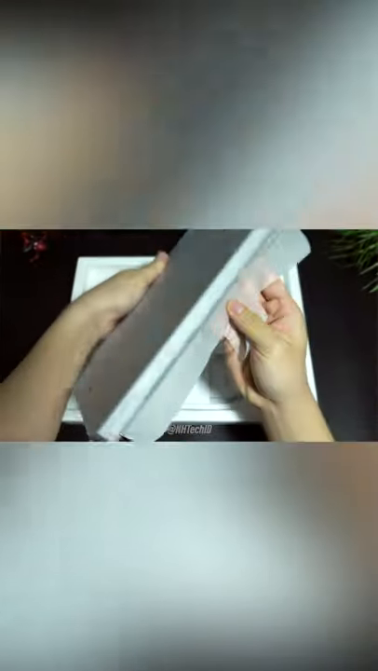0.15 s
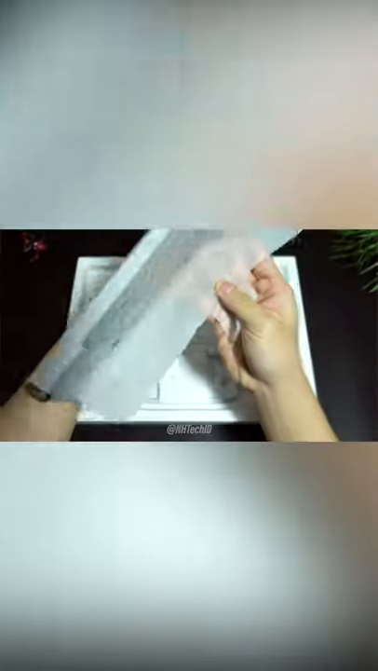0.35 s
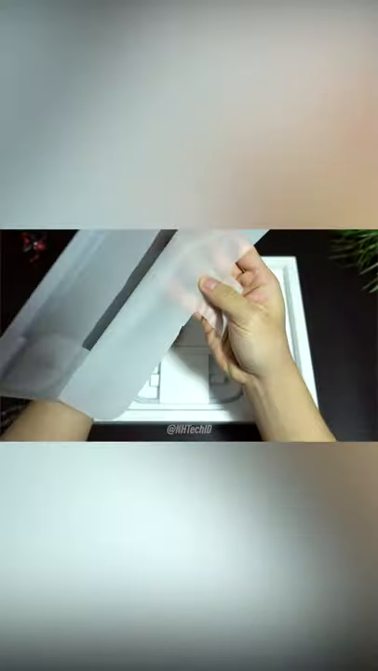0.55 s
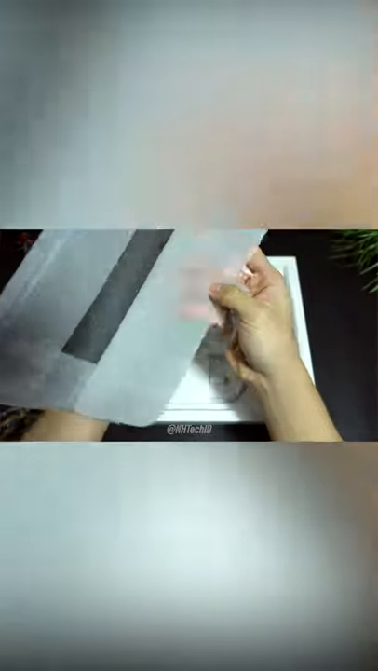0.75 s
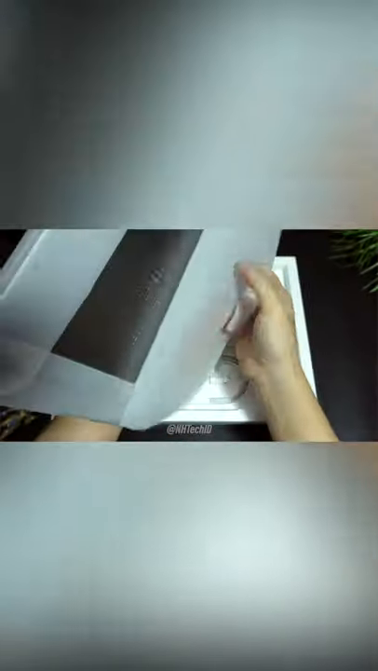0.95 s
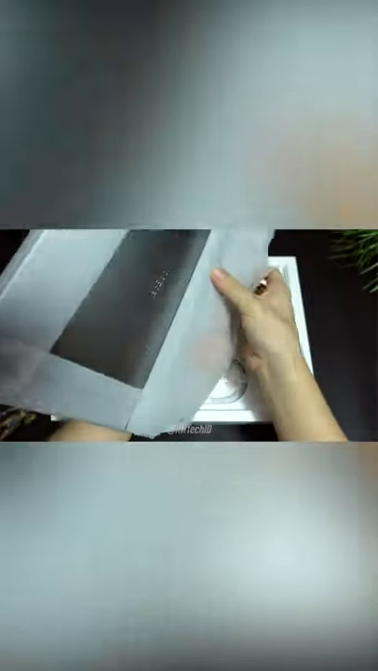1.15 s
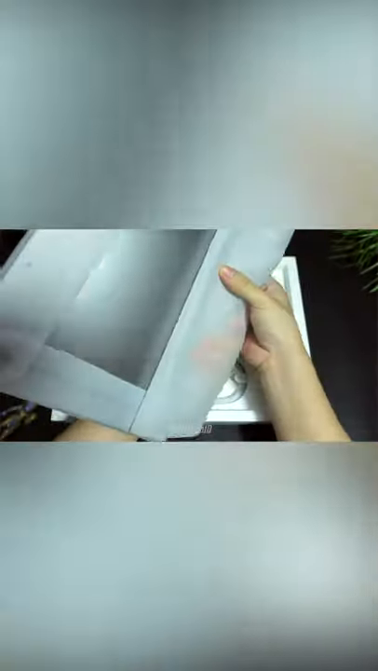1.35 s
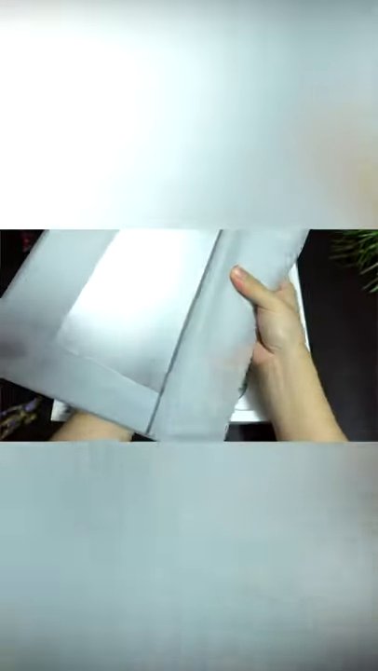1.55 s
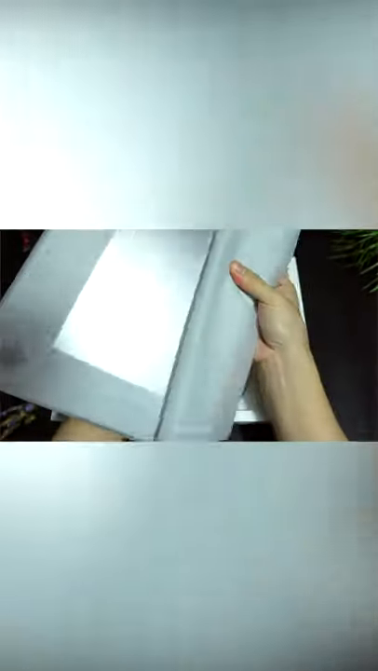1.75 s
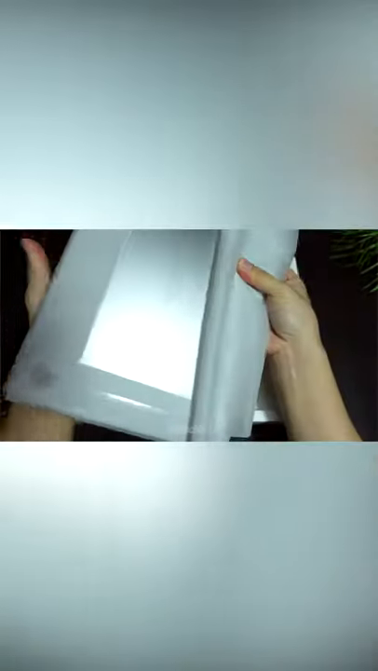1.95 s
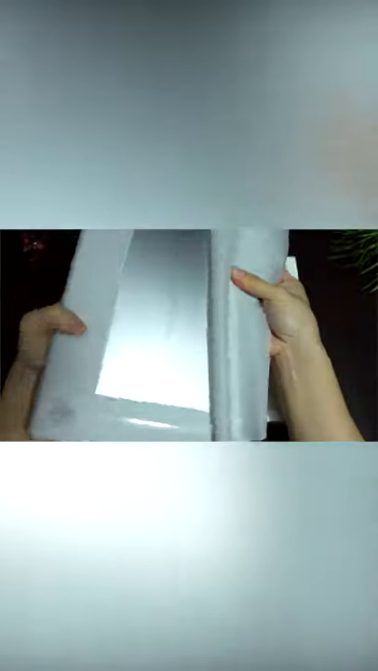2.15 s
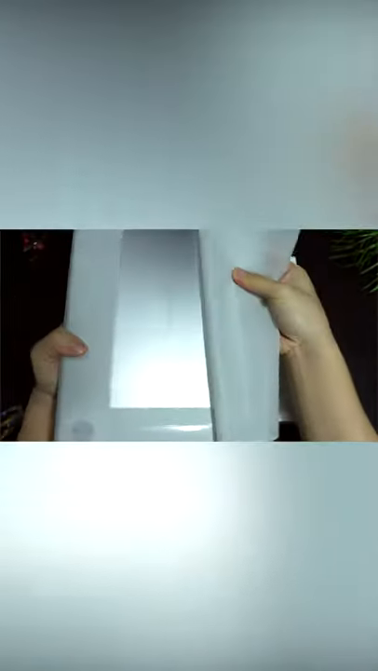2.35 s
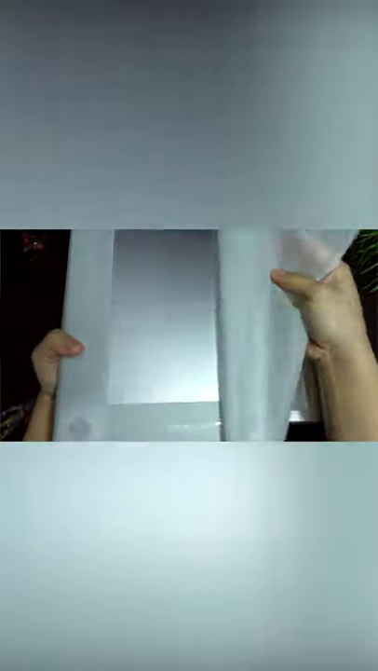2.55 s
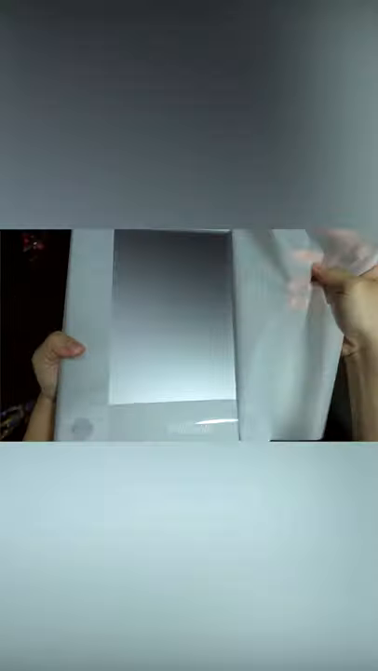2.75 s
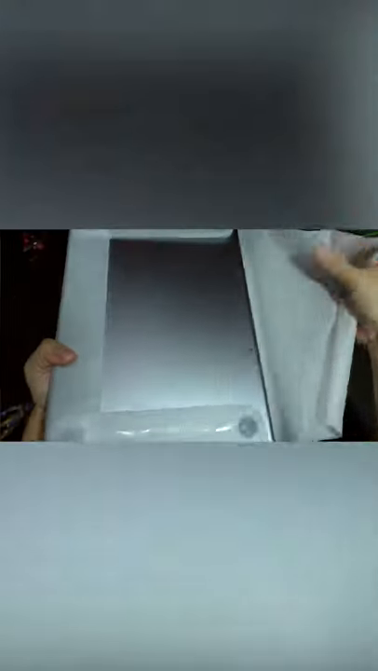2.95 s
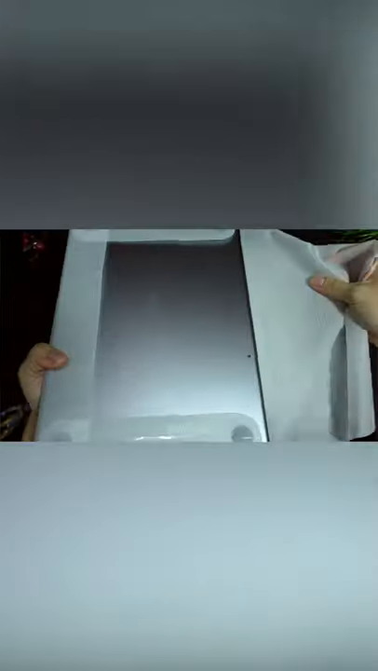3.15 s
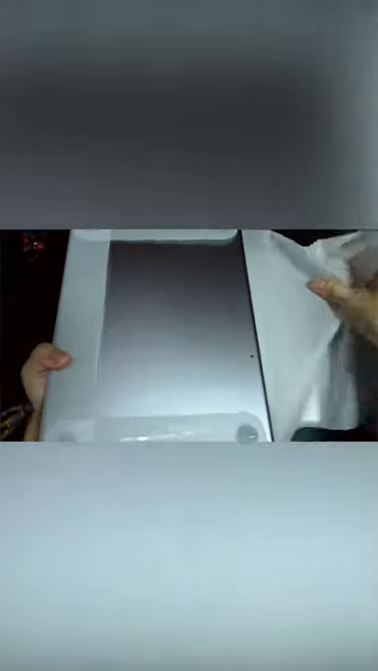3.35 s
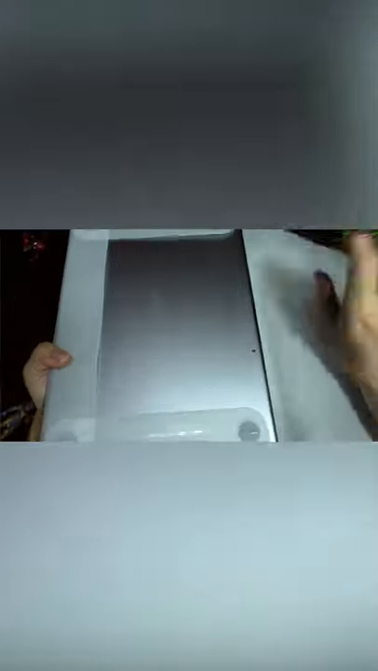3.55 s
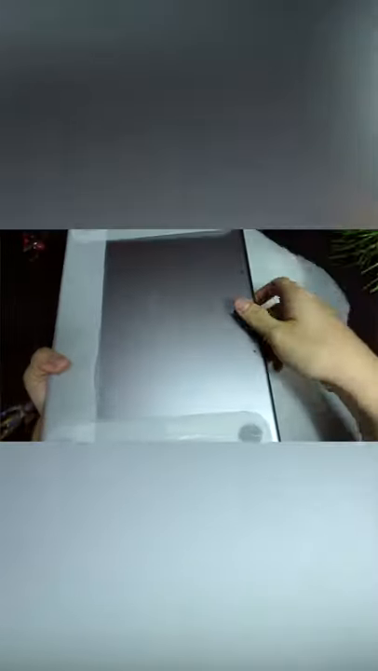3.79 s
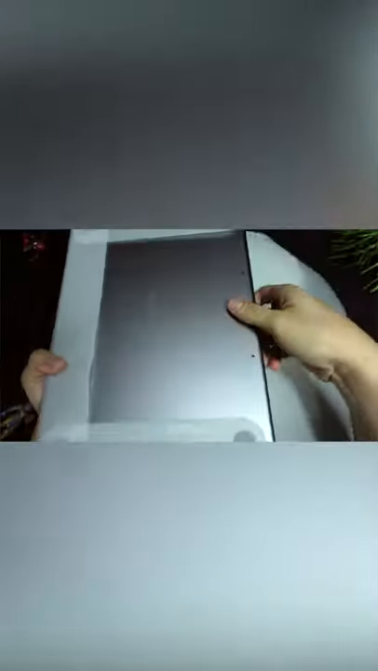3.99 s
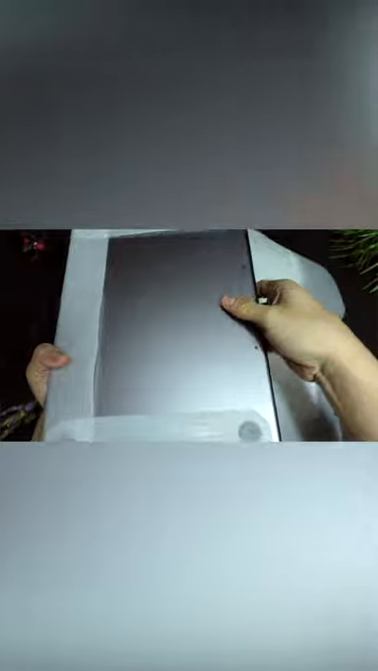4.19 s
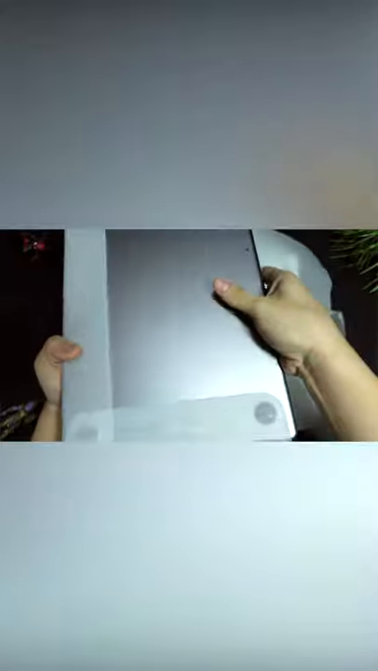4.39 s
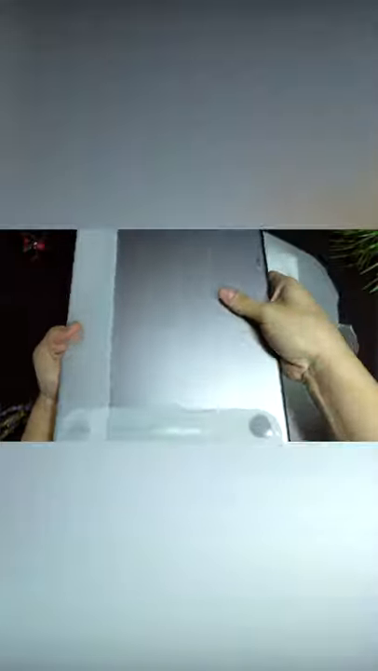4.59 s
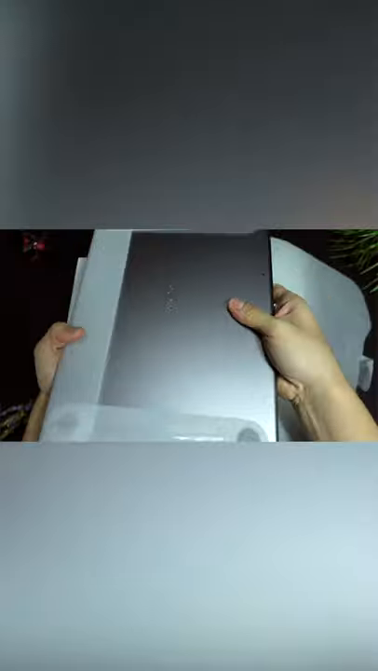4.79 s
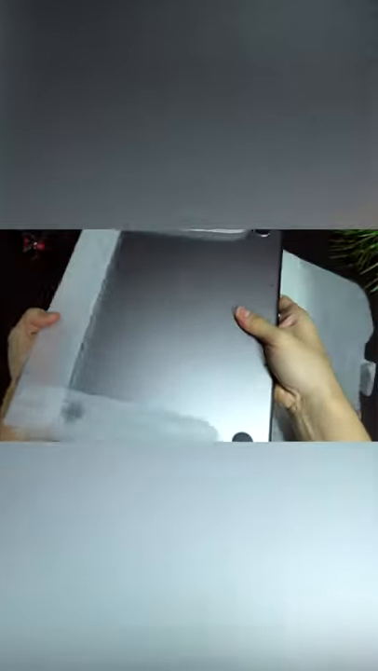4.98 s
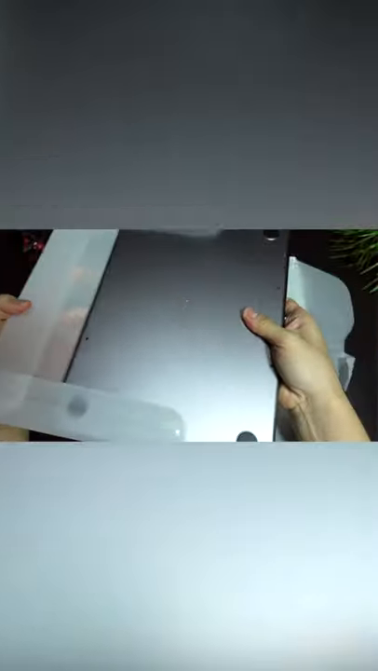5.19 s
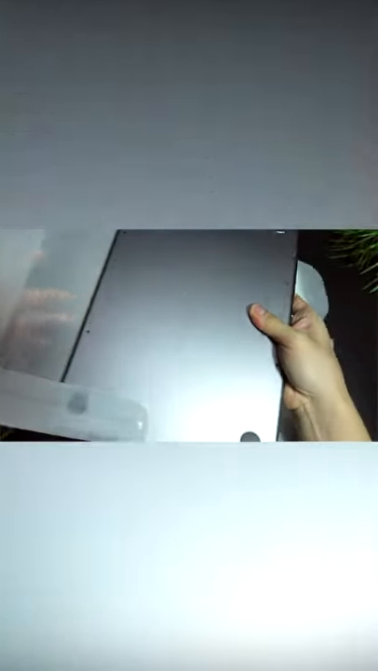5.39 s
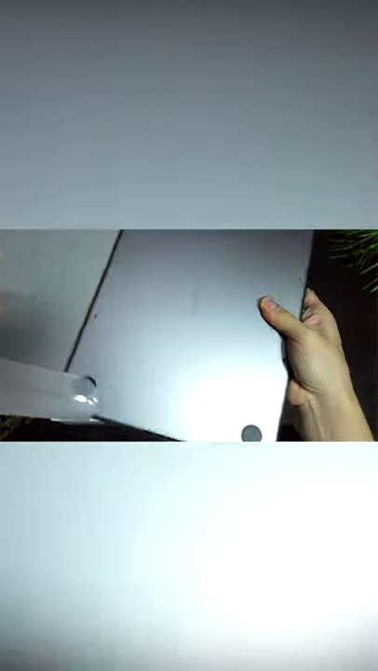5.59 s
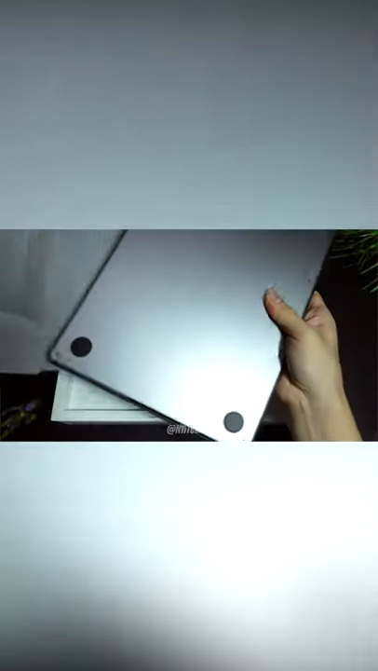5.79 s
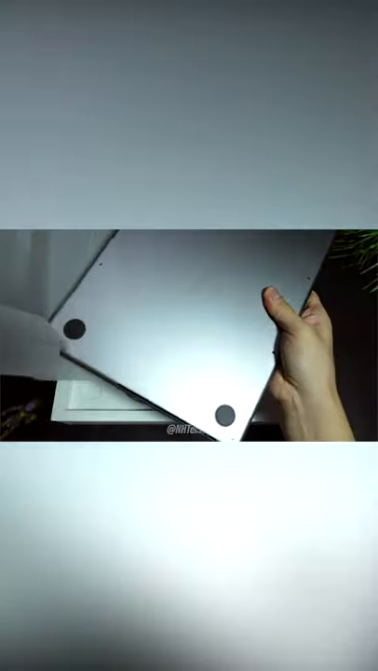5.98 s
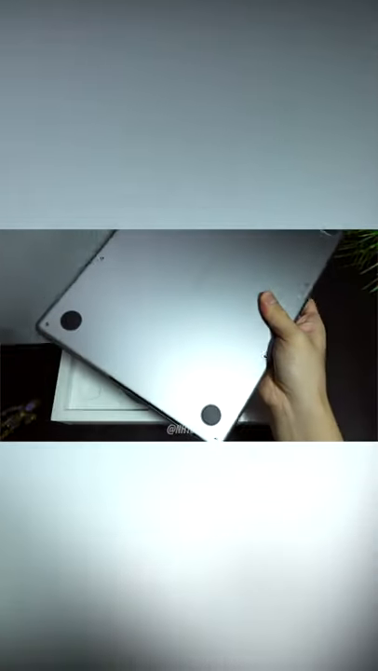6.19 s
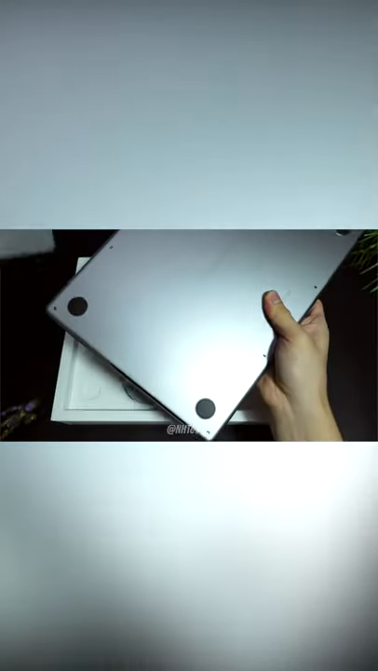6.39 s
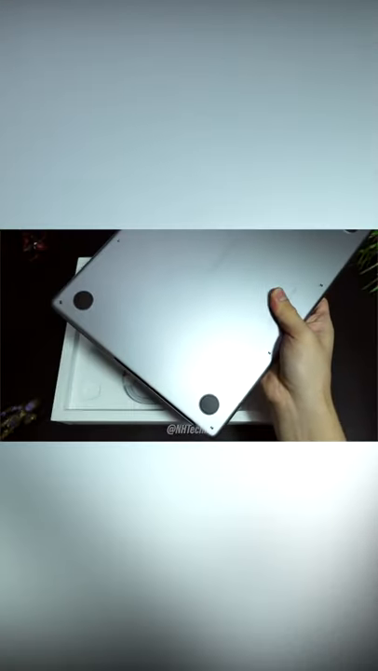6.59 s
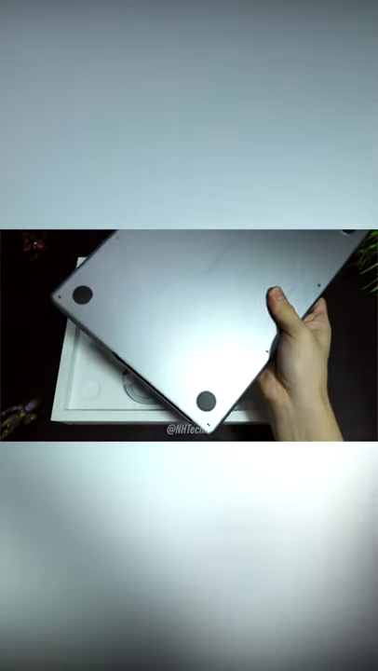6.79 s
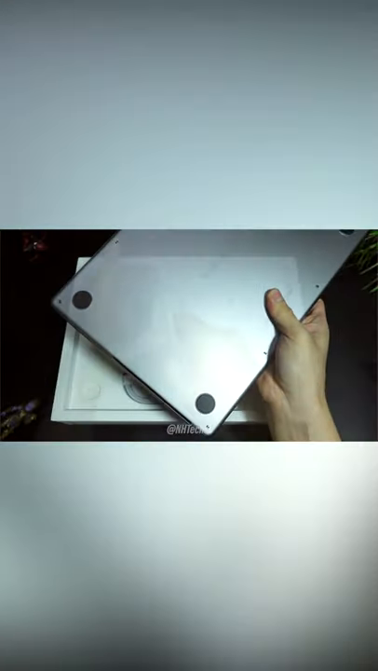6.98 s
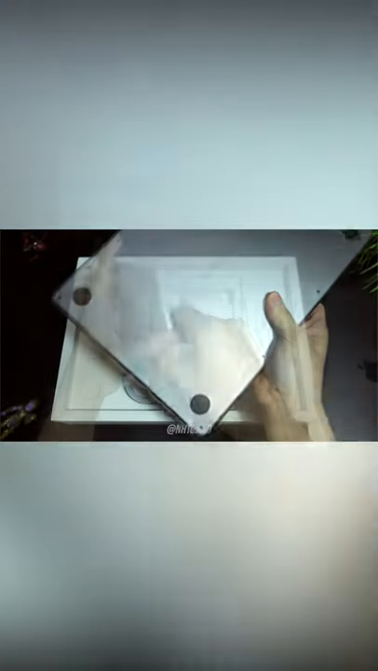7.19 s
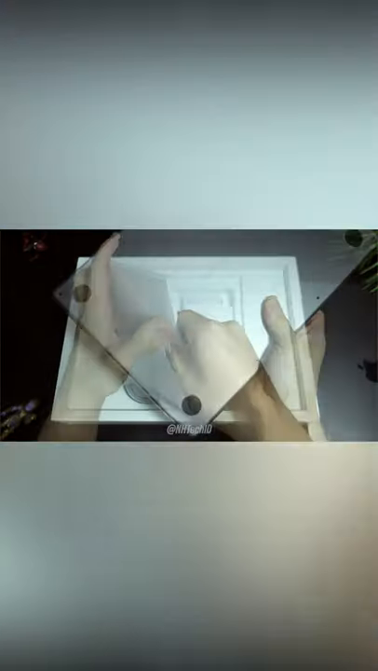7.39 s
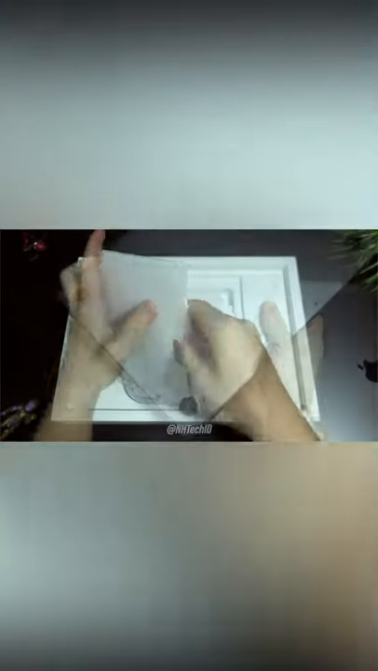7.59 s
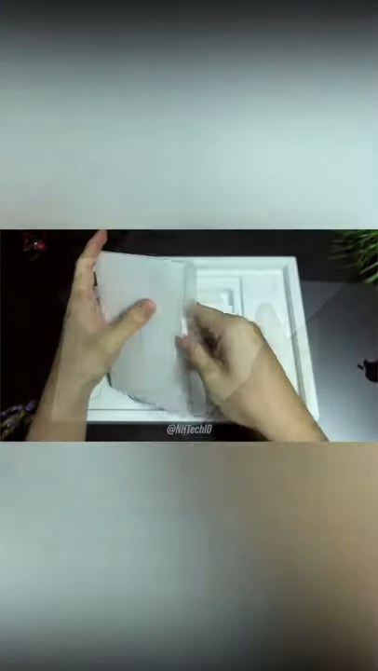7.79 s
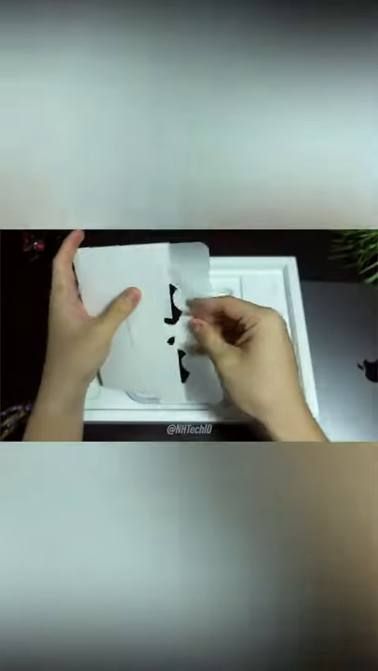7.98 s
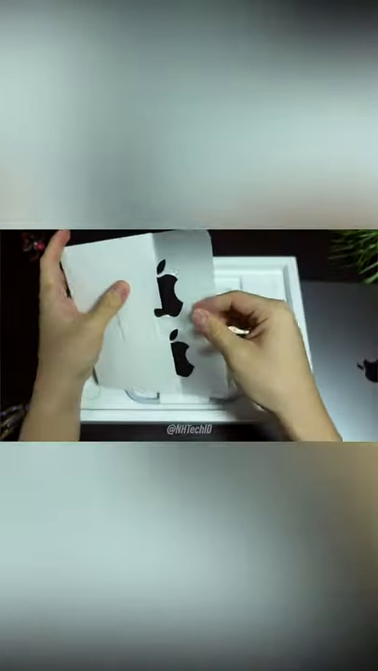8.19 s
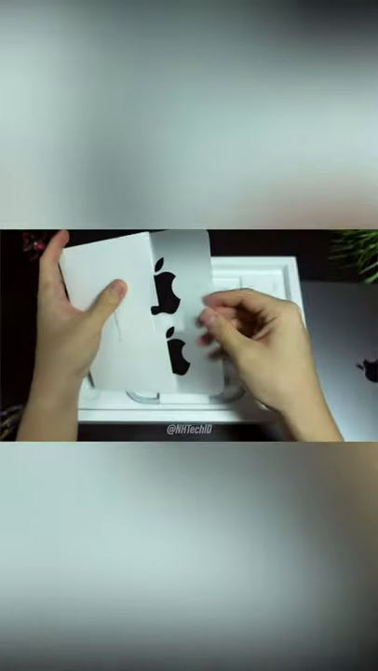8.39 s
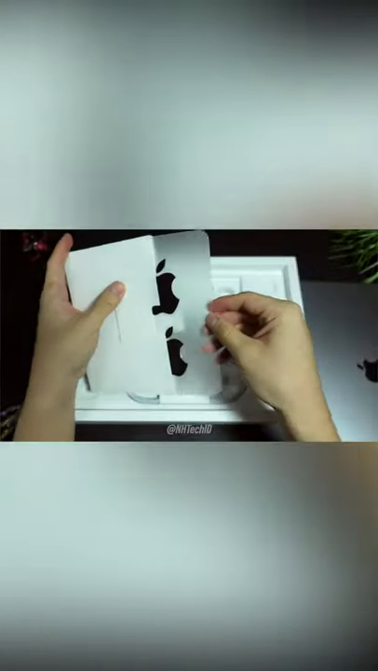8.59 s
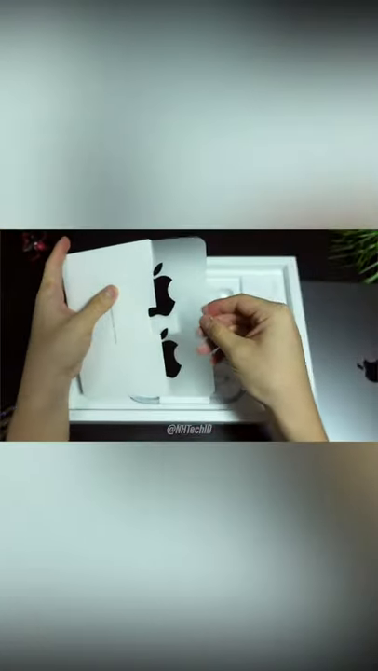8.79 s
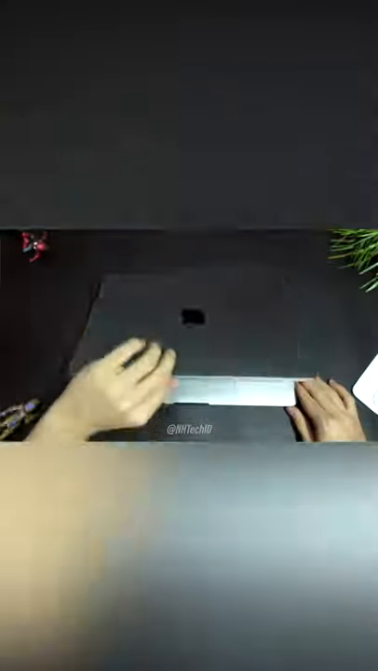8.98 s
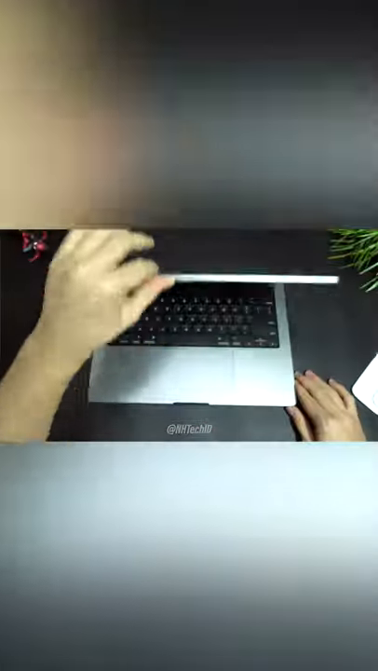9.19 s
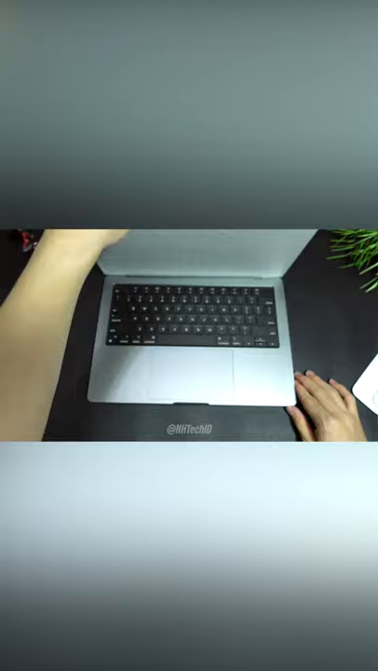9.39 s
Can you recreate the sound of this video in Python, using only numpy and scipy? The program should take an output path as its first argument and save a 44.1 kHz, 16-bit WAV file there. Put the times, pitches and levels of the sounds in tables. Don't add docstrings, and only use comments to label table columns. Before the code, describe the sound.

Stiff sheet packaging crackles and snaps sharply in bursts over papery sliding friction, with soft low knocks from hands and box. Activity is dense for the first five seconds, then eases into sparse, delicate card rustling. Near the end everything dips out briefly before the low hum and air of the room fade back with tiny nail ticks. Close microphone, short room reflections, slightly dulled extreme treble.

```python
import sys
import numpy as np
from scipy import signal
from scipy.fft import rfft, irfft, next_fast_len
from scipy.io import wavfile
from scipy.ndimage import uniform_filter1d

SR = 44100
rng = np.random.default_rng(int(sys.argv[2]) if len(sys.argv) > 2 else 0)


def materialize(psi):
    bounded = np.clip(np.atleast_2d(psi).T, -1, 1)
    quanta = np.round(bounded * 32767).astype(np.int16)
    wavfile.write(sys.argv[1], SR, quanta)


def undo_db(level):
    steps = np.asarray(level, float) / 20
    return 10 ** steps


N = 416741
SIZE = 2048
SCENE_CHANGE_S = 8.541


def level(x, db):
    return x * undo_db(db) / np.sqrt(np.mean(x ** 2))


def curve(s, v):
    return np.interp(np.arange(N) / SR, s, v)


def walk(rate):
    hold = int(SR / rate)
    steps = np.repeat(rng.standard_normal(N // hold + 1), hold)
    return 1.2 * uniform_filter1d(steps, hold)[:N]


# start in seconds, level in dB, hollow part in dB, crisp part in dB, main panel in Hz.
PEEL_CRACKS = [(.0176, -35, 0, -6, 1850), (.1027, -11, -16, -8, 3280), (.371, -47, 6, -23, 1830),
               (.7305, -32, 1, -7, 2270), (.8038, -27, 5, -3, 2260), (.9105, -11.5, -12, -8, 3660),
               (.9265, -26, -3, -3, 2800), (.995, -25, -9, -11, 2750), (1.105, -12.5, -14, -8, 2240),
               (1.3357, -17, -6, -9, 2750), (1.4443, -24, -18, -6, 3360), (1.5187, -20, -15, -16, 1950),
               (1.5283, -19, -9, 0, 1950), (1.559, -14, -10, 1, 2330), (2.111, -24, -17, -6, 2650),
               (2.1635, -22, -15, -3, 2710), (2.2323, -30, -2, -22, 2470), (2.8337, -18, 3, -4, 3200),
               (2.9552, -16, -31, -11, 3400), (3.2644, -20, -31, -8, 3060), (3.4677, -13.5, -11, -11, 2990)]
SLIDE_CRACKS = [(4.052, -25, -5, -5, 4600), (4.1141, -16, -11, -1, 3320), (4.1296, -16, -16, -7, 2070),
                (4.1571, -17, -13, 3, 2070), (4.4079, -23, -7, -3, 3400), (4.5794, -15, -17, -15, 2900),
                (5.7378, -26, -16, -6, 2090), (5.8728, -31, 0, -10, 2400), (6.5644, -42, -9, -22, 1670),
                (6.6153, -40, -5, -22, 2070), (6.889, -44, 0, -14, 1830), (7.464, -40, -7, 2, 3260),
                (7.529, -45, -4, 2, 3940), (7.5965, -37, -10, -4, 3650), (7.7144, -36, -23, -13, 2360),
                (8.313, -52, 1, -16, 2010)]
PEEL_SNAPS = [(.6174, -36, -3, -23, 2250), (.7792, -28, 6, -3, 2260), (.7929, -22, -4, -12, 2260),
              (1.097, -13, -13, -3, 2320), (1.184, -13, -18, -11, 2320), (1.2003, -22, -4, -2, 3010),
              (1.4249, -26, -16, -12, 3400), (1.7032, -27, -8, -21, 1950), (1.7543, -27, -11, -13, 2390),
              (1.8347, -16, -6, 0, 3600), (2.6462, -15, -4, 0, 2200), (2.6904, -16, -5, -7, 3070),
              (2.7512, -20, -8, -15, 2500), (2.7884, -15.5, -8, -15, 2720), (2.8545, -18.5, -5, 1, 2830),
              (3.002, -27, 3, -13, 1950), (3.3779, -24.5, -7, -26, 1850)]
SLIDE_SNAPS = [(4.0168, -25, -7, -9, 2450), (4.026, -27, -17, -6, 3610), (4.07, -20.5, -8, -13, 4850),
               (4.0966, -21, -7, -11, 3400), (4.1191, -21, -15, -15, 2270), (4.2686, -27, -13, -13, 4300),
               (4.573, -11.5, -12, -4, 3300), (4.5954, -20, -10, -17, 1600), (4.6745, -6, -17, -6, 3010),
               (4.899, -15, -22, -8, 1810), (5.364, -25, -6, -16, 2600), (6.0884, -34, 4, -22, 2100),
               (6.096, -38, 8, -25, 2810), (6.7963, -35, -3, -16, 2140), (6.9648, -44, -3, 1, 3030),
               (7.1925, -34, -15, -12, 4140), (7.2844, -28, -7, -5, 2810), (7.2978, -34, -27, -2, 2870),
               (8.4697, -72, 12, -19, 1635)]
# start in seconds, level in dB, hollow part in dB, crisp part in dB.
PEEL_CRUNCHES = [(.0482, -24, -5, -6), (.6787, -34, 0, -11), (1.0351, -22, -9, -9), (1.2243, -23, -15, -8),
                 (1.813, -28, -20, -12), (2.8428, -23, -9, -8), (2.848, -19, 1, -11), (2.8994, -21, -6, -6),
                 (3.4943, -25, -12, -9)]
SLIDE_CRUNCHES = [(3.807, -36, -4, -8), (3.9774, -29, 3, -3), (4.0848, -23, -4, -13),
                  (4.4833, -31, -12, -9), (4.5609, -16, -15, -6), (4.7011, -28, -2, -9), (5, -26, -5, -10),
                  (5.5228, -31, -2, -12), (5.7491, -29, -9, -12), (5.8304, -32, -22, -19),
                  (5.8776, -26, -19, -14), (6.2896, -42, -3, -11), (6.3527, -43, -3, -6),
                  (6.5777, -45, -1, -21), (6.9764, -30, -8, -18)]
FOLDS = [
    (.9421, -25, -6, -11, 1750),
    (1.4804, -25, -7, -9, 3600),
    (2.4269, -28, -6, -9, 4000),
    (2.4842, -23, -9, -4, 1900),
    (2.5984, -26, 3, -9, 1800),
    (3.4782, -19, -3, -6, 3400),
    (3.9318, -25, -8, -10, 3200),
    (4.1778, -22, -14, -12, 1800),
    (4.5402, -25, -14, -5, 3400),
    (4.7532, -19, -20, -7, 1850),
]
RIPS = [
    (1.02, -26, -6, -5, 3000),
    (1.617, -30, -4, -11, 1950),
    (2.4003, -38, -1, -18, 2650),
    (2.9193, -21, -8, -10, 2800),
    (3.1198, -24.5, -4, -7, 2550),
    (3.5083, -27, -15, -4, 3650),
    (3.8861, -25, -6, -8, 3300),
    (1.822, -23, -20, -14, 2650),
    (7.874, -48, -12, -22, 2700),
]
PEEL_PRICKS = [(0.0704, -36, 0, -15, 2390), (0.1134, -23, -8, -10, 2920), (0.5284, -59, 4, -14, 1970),
               (0.5814, -53, -1, -12, 3170), (0.5894, -51, 5, -8, 1810), (0.6404, -51, 6, -23, 1840),
               (0.7474, -48, 14, -15, 1990), (0.7714, -32, 1, -26, 1960), (0.8154, -31, -15, -13, 2440),
               (0.8244, -37, -10, -12, 2440), (1.0141, -25, -10, -4, 2600), (1.3184, -31, -7, -8, 2250),
               (1.5035, -27, -15, -9, 2930), (1.5404, -22, -11, -8, 2870), (1.5744, -25, -18, -2, 4880),
               (1.6424, -30, -7, -9, 3370), (1.6756, -31, -8, -20, 1950), (2.1264, -44, -11, -4, 2650),
               (2.382, -34, -12, -20, 2620), (2.6324, -41, -13, -3, 3330), (2.7307, -25, -10, -20, 2300),
               (2.7434, -26, -9, -6, 3090), (2.7711, -26, -1, -17, 2280), (2.8155, -25, -12, -10, 2510),
               (2.8764, -26, -10, -6, 2930), (3.0214, -31, -6, -14, 2290), (3.0679, -32, 7, -20, 2460),
               (3.2001, -29, -5, -13, 3480), (3.2934, -30, -19, -8, 3610), (3.3914, -27, -8, -18, 2240),
               (3.5483, -27, -15, -16, 3070), (3.7554, -47, -10, -9, 1430), (3.7773, -45, -9, -10, 2130)]
SLIDE_PRICKS = [(3.8651, -34, -4, -22, 2560), (3.92, -36, -11, 3, 4120), (3.9654, -30, -5, -4, 3140),
                (4.1994, -28, -13, 1, 2380), (4.2134, -27, -7, -15, 2740), (4.3869, -34, -21, -14, 2040),
                (4.6214, -26, -9, -11, 2220), (4.9284, -33, -5, -7, 2300), (4.9492, -27, -13, -8, 3420),
                (4.9736, -29, -12, -15, 2630), (5.0539, -30, -11, -8, 2180), (5.3358, -28, -31, -5, 2640),
                (5.3724, -30, -6, -10, 2550), (5.6047, -32, -9, -7, 2680), (5.6436, -35, -2, -11, 3250),
                (5.6884, -44, 1, -10, 3360), (6.114, -33, -20, -10, 2750), (6.4223, -44, -4, -25, 2420),
                (6.4996, -56, -5, -18, 2690), (6.6593, -50, -5, -17, 1750), (6.7421, -50, -1, -18, 2260),
                (6.9434, -41, -12, -13, 2870), (7.1142, -48, -3, -20, 1510), (7.2014, -39, -10, -5, 2910),
                (7.2554, -35, -7, -8, 1960), (7.4305, -43, -22, -5, 3110), (7.5514, -55, -14, 3, 2650),
                (7.7244, -44, -12, -14, 2640), (7.7514, -54, -19, -9, 2330), (7.9544, -47, 2, -5, 3020),
                (8.1994, -76, 24, 0, 2690), (8.2134, -62, -6, -21, 2160)]
# start in seconds, level in dB, crisp part in dB, main panel in Hz.
TICKS = [(0.509, -43, -24, 1480), (0.5746, -39.5, -11, 2000), (1.0593, -17, -10, 2580),
         (1.1442, -15, -10, 2300), (1.2595, -21, -15, 2990), (3.3517, -19, -16, 1880),
         (4.638, -20, -1, 4380), (5.148, -19, -17, 2190), (5.3966, -20, -16, 2410), (5.782, -25, -24, 1580),
         (6.1793, -30, -18, 2520), (6.9382, -34, -6, 2940), (7.3477, -27, -9, 1680),
         (7.4994, -35, -15, 2830), (7.8117, -45, 3, 5460)]
# start in seconds, level in dB.
NAIL = [
    (8.7794, -66),
    (8.8694, -60),
    (8.9494, -62.5),
    (9.0294, -67),
    (9.0994, -60),
]


def snaps():
    kinds = [(1.6, PEEL_CRACKS + SLIDE_CRACKS), (4.0, FOLDS), (10.0, RIPS),
             (2.6, PEEL_SNAPS + SLIDE_SNAPS), (2.1, PEEL_PRICKS + SLIDE_PRICKS)]
    rows = [(*r[:4], ms, r[4]) for ms, kind in kinds for r in kind]
    rows += [(*r, 4.0, 2650) for r in PEEL_CRUNCHES + SLIDE_CRUNCHES]
    nail_clicks = [(s, db, -9.0, 4500) for s, db in NAIL]
    s, db, crisp_db, hz = np.transpose(TICKS + nail_clicks)
    ticks = creases(s, db - 6.0, -12.5, crisp_db, 1.2 + 0 * s, hz, size=SIZE)
    return creases(*np.transpose(rows), size=SIZE) + ticks


def creases(s, db, hollow_db, crisp_db, ms, hz, size):
    quick, push, slow = (buckle(share * ms, size) for share in (0.7, 1, 0.9))
    main = main_panel(push, hz, size)
    others = irfft(push * panel(BODY, hz, size))
    balance = np.std(others, axis=1) / np.std(main, axis=1)
    main *= undo_db(2.5) * balance[:, None]
    out = lay(main + others, s, db, ms)
    for span, rel_db, drive in ((HOLLOW, hollow_db, slow), (CRISP, crisp_db, quick),
                                (FLAP, hollow_db - 19.0, slow)):
        wave = irfft(drive * panel(span, span[3] + 0 * s, size))
        out = out + lay(wave, s, db + rel_db, ms)
    return out


def buckle(ms, size):
    ms = np.clip(ms, 0.4, 14)[:, None]
    t = np.arange(size) / SR / (ms / 1000)
    swell = 1 - np.exp(-t / (0.04 + 0.025 * ms))
    stop = np.exp(-0.8 * t ** (1.1 + 0.17 * ms))
    push = rfft(rng.standard_normal(t.shape) * swell * stop)
    return push / np.sqrt(uniform_filter1d(np.abs(push) ** 2, size=size // 80))


def rings(f, hz, width, gain):
    return np.sum(gain * 1j * f * width / (hz ** 2 - f ** 2 + 1j * f * width), axis=-2)


# low in Hz, high in Hz, ring width in Hz, centre in Hz, fall in dB per octave squared.
HOLLOW = (430, 1050, 160, 700, 11)
BODY = (1150, 5400, 420, 2250, 9.)
CRISP = (5200, 11500, 1200, 5390, 6.8)
FLAP = (170, 350, 70, 270, 3.4)


def panel(span, centre_hz, size, modes=6):
    low, high, width, _, fall_db = span
    f = np.fft.rfftfreq(size, 1 / SR)
    centre = centre_hz[:, None, None]
    step = np.arange(modes)[:, None]
    pick = rng.random((len(centre_hz), modes, 2))
    hz = low * (high / low) ** ((step + pick[..., :1]) / modes)
    if span is BODY:
        miss = np.log(hz / centre)
        nearest = np.abs(miss).argmin(axis=1)[:, None]
        hz = hz / np.exp(np.take_along_axis(miss, nearest, axis=1))
    luck_db = 5 * pick[..., 1:]
    tilt_db = -1.5 * np.log2(hz / low) - fall_db * np.log2(hz / centre) ** 2
    gain = (-1.0) ** step * undo_db(luck_db + tilt_db)
    reach = rings(f, np.array([[np.sqrt(low * high)]]), high, 1)
    return reach * rings(f, hz, width * np.sqrt(hz / low), gain)


def main_panel(drive, hz, size):
    hz = hz[:, None, None]
    return irfft(drive * rings(np.fft.rfftfreq(size, 1 / SR), hz, 90 + 0.12 * hz, 1))


def lay(wave, s, db, ms):
    at = (s * SR).astype(int)[:, None] + np.arange(wave.shape[1])
    gain = undo_db(db) * np.sqrt(ms * SR / 1000 / np.sum(wave ** 2, axis=1))
    wave = wave * gain[:, None]
    return np.bincount(at.ravel(), wave.ravel(), N + SIZE)[:N]


# start in seconds, level in dB, pitch in Hz.
ECHOES = [(.1027, -13, 690), (.1027, -22, 1720), (.7792, -29, 860), (.9105, -15, 2370), (1.184, -18, 3300),
          (1.8347, -19, 2450), (2.6462, -19, 4600), (2.9552, -21, 1810), (3.4677, -19, 2450),
          (4.0848, -25, 1500), (4.0966, -24, 390), (4.1141, -20, 1500), (4.5954, -29, 330),
          (4.6745, -18, 1720), (4.899, -19, 4390), (5.3966, -31, 620), (5.7565, -32, 2300),
          (5.935, -38, 700), (5.96, -35, 800), (6.0884, -30, 430), (6.5777, -42, 2000)]


def echoes():
    s, db, hz = np.transpose(ECHOES)
    ms = 2.2 + 0 * s
    return lay(main_panel(buckle(ms, SIZE), hz, SIZE), s, db, ms)


# time in seconds, share from 0 to 1.
CRACKLE = [(.6, .6), (.85, .5), (1, .7), (1.6, .6), (1.9, .4), (2.3, .3), (2.55, .35), (2.8, .7), (3.4, .7),
           (3.65, .3), (4.1, .7), (4.8, .6), (5.05, .25), (5.7, .12), (5.9, .55), (6.5, .35), (7.3, .4),
           (8, .2)]
# low in Hz, high in Hz, ring width in Hz, centre in Hz, fall in dB per octave squared.
SLIDE_BODY = (1000, 5000, 600, 2350, 6.)


def rustle(per_s=300.0, spread_db=3.2, moody_db=3.5):
    share = np.clip(curve(*np.transpose(CRACKLE)), 0.02, 0.98)
    db, hollow_db, crisp_db = motion()
    chance = undo_db(4.0 * walk(30)) * per_s / SR
    at = np.flatnonzero((rng.random(N) < chance)[:int(SCENE_CHANGE_S * SR)])
    luck = rng.standard_normal((N // 20, 4))[:len(at)].T
    size_db = db[at] + 10 * np.log10(share[at]) - 2.5 + spread_db * np.minimum(np.abs(luck[0]), 2.1)
    ms = 1.76 * np.exp(0.4 * luck[3])
    hz = np.clip(BODY[3] * np.exp(0.45 * luck[1]), 1000, 5000)
    out = creases(at / SR, size_db, hollow_db[at] + moody_db * luck[1], crisp_db[at] + moody_db * luck[2],
                  ms, hz, size=SIZE // 4)
    jerk_db = 2.3 * walk(40)
    spread = 1.35
    sizes = np.repeat([1 / spread, spread], 12)
    for span, rel_db in ((SLIDE_BODY, 0), (HOLLOW, hollow_db - 2.1), (CRISP, crisp_db),
                         (FLAP, hollow_db - 5.0)):
        response = np.abs(panel(span, span[3] * sizes, SIZE // 4).reshape(2, 12, -1)) ** 2
        for colour in np.sqrt(uniform_filter1d(response.mean(axis=1), size=3)):
            slide = signal.oaconvolve(rng.standard_normal(N), np.fft.fftshift(irfft(colour)), "same")
            drift_db = 2.2 * walk(14)
            gain = np.sqrt(1 - share) * undo_db(db + rel_db + jerk_db + drift_db)
            out = out + level(slide, -2.5) * gain
    return out * (np.arange(N) / SR < SCENE_CHANGE_S)


# fastest at in seconds, level in dB, seconds to swell 20 dB,
# seconds to ease 20 dB, hollow part in dB.
PULLS = [(.12, -44.5, .8, .27, -8), (.74, -50, .19, .15, 4), (.79, -37.5, .04, .7, 3),
         (.93, -33, .1, .2, -14), (1.05, -30, .18, .36, -3), (1.21, -32, .15, .17, -8),
         (1.32, -45, .2, .4, -7), (1.55, -31, .25, .36, -6), (1.84, -31, .17, .14, -11),
         (2.2, -50, .25, .3, 1), (2.41, -37, .22, .38, -14), (2.67, -35.5, .15, .3, -5),
         (2.83, -30.5, .22, .17, -4), (2.93, -32, .2, .3, -5), (3.3, -39, .8, .4, -4),
         (3.49, -28.5, .2, .17, -6)]
SLIDES = [
    (3.82, -44, .09, .2, -8),
    (3.95, -32, .14, .12, 0),
    (4.11, -29, .07, .22, -2),
    (4.4, -41, .25, .33, -11),
    (4.568, -28.5, .04, .33, -5),
    (4.93, -35, .12, .7, -7),
    (5.39, -44, .08, .12, 6),
    (5.54, -35, .9, .45, -11),
    (5.75, -42, .15, .1, -2),
    (5.87, -41, .1, .17, -2),
]
# as for the pulls, but ending in crisp part in dB.
SLEEVE = [(6.13, -48.5, .2, .36, -3), (6.58, -57, .06, .28, -22), (6.82, -53, .04, .4, -16),
          (6.98, -42, .06, .18, -14), (7.2, -47, .02, .2, -10), (7.26, -42, .05, .2, -9),
          (7.31, -39, .12, .15, -9), (7.55, -59, .3, .4, -5), (7.73, -52, .04, .14, -14),
          (7.88, -54, .04, .1, -10), (7.95, -54, .1, .13, 3), (8.0, -50, .1, .09, 4),
          (8.06, -58, .1, .1, -6), (8.17, -66, .2, .13, -6)]
# time in seconds, level in dB.
TAUT = [(0, -5), (.7, -8), (.85, -13), (1.1, -9), (1.4, -11), (1.6, -5), (1.75, -13), (1.85, -8),
        (2.4, -12), (2.7, -8), (2.9, -4), (3.1, -11), (3.9, -12), (4.15, -7), (4.8, -7), (4.9, -1),
        (5.6, -2), (5.8, -9)]


def motion():
    t = np.arange(0, N, 64) / SR
    power, hollow, crisp = 1e-18, 0, 0
    taut_db = np.interp(t, *np.transpose(TAUT))
    pulls = [(r[0], r[1] - 1.5, *r[2:], taut_db) for r in PULLS + SLIDES]
    pulls += [(*r[:4], -7.0, r[4]) for r in SLEEVE]
    for s, db, swell, ease, hollow_db, crisp_db in pulls:
        pull = undo_db(db - 20 * np.maximum((s - t) / swell, (t - s) / ease)) ** 2
        power = power + pull
        hollow = hollow + pull * hollow_db
        crisp = crisp + pull * crisp_db
    return curve(t, 10 * np.log10(power)), curve(t, hollow / power), curve(t, crisp / power)


# start in seconds, peak in dB, pitch in Hz.
BUMPS = [
    (0.05, -39, 84.6),
    (2.849, -35, 67.3),
    (3.479, -36, 115),
    (4.569, -34.5, 88.8),
    (4.679, -39.5, 84.3),
    (5.706, -36, 70),
]


def bumps(t60=0.067):
    t, out = np.arange(N) / SR, 0
    for s, db, hz in BUMPS:
        u = np.maximum(t - s, 0)
        ring = np.sin(2 * np.pi * hz * u) + 0.5 * np.sin(2 * np.pi * 2.4 * hz * u)
        out = out + undo_db(db + 5.0 - 60 * u / t60) * (1 - np.exp(-u / 0.002)) * ring
    return out


# frequency in Hz, reverberation time in seconds.
ROOM_T60 = [(400, 0.46), (2500, .33), (6000, 0.31), (12000, 0.088)]


def room(x):
    out, places = 0, 3
    where = np.arange(N) // 3000 % places
    hz, seconds = np.transpose(ROOM_T60)
    for k in range(places):
        f, t, frames = signal.stft(rng.standard_normal(SR // 2), SR, nperseg=256)
        t60 = np.interp(np.log(f + 1), np.log(hz), seconds)
        tail = signal.istft(frames * undo_db(-60 * t / t60[:, None]), SR, nperseg=256)[1]
        tail *= 1 - np.exp(-(np.arange(len(tail)) / SR / 0.0017) ** 2)
        tail = tail * undo_db(-13) / np.sqrt(np.sum(tail ** 2))
        here = uniform_filter1d(1.0 * (where == k), size=400)
        out = out + signal.oaconvolve(x * here, tail)[:N]
    return out


# frequency in Hz, density in dB per Hz.
AIR = [(15, -46.5), (25, -17.5), (132, -7), (240, -13.5), (800, -21.5), (2300, -36), (12300, -46),
       (16000, -90)]
# frequency in Hz, width in Hz, level in dB.
HUM = [
    (58.6, 21, -67.5),
    (132, 9.3, -68.5),
    (279.6, 38, -68.5),
    (373, 26, -66),
    (628, 15, -76),
]
# time in seconds, gain.
FADE = [
    (0, 1.07),
    (6.5, 0.81),
    (8.05, 0.92),
    (8.54, 0.018),
    (8.9, .2),
    (9.45, 0.7),
]


def room_tone():
    size = next_fast_len(N)
    f = np.fft.rfftfreq(size, 1 / SR) + 1
    hz, db = np.transpose(AIR)
    colour = undo_db(np.interp(np.log(f), np.log(hz), db))
    out = level(irfft(rfft(rng.standard_normal(size)) * colour, size), -54.5)
    shake = rfft(rng.standard_normal(size))
    for hz, width, db in HUM:
        hum = irfft(shake * rings(f, np.array([[hz]]), width, 1) ** 2, size)
        out = out + level(hum, db)
    return out[:N] * undo_db(1.4 * walk(6)) * np.abs(curve(*np.transpose(FADE)))


def scene():
    paper = snaps() + rustle() + echoes()
    return (paper + room(paper) + bumps() + room_tone())[None]


def top_cut(x):
    return signal.sosfilt(signal.butter(12, 12470, fs=SR, output="sos"), x)


def record(dry):
    dip = np.clip(np.abs(np.arange(N) / SR - SCENE_CHANGE_S) / 0.03 - 0.1, 0, 1)
    low_pass = signal.ellip(10, 0.5, 60, 11820, fs=SR, output="sos")
    mix = np.clip(signal.sosfilt(low_pass, dry * dip), -0.98, 0.98)
    return top_cut(mix)


dry = scene()
out = record(dry)
materialize(out)
```